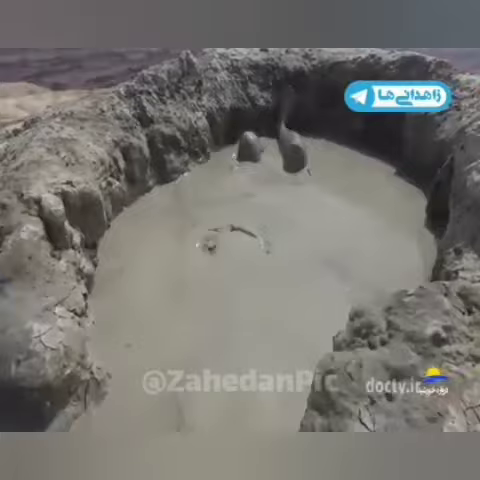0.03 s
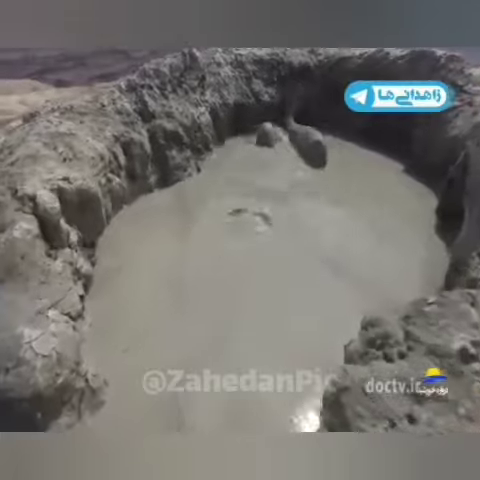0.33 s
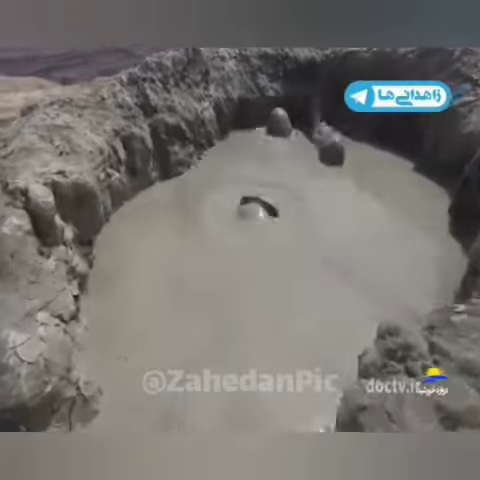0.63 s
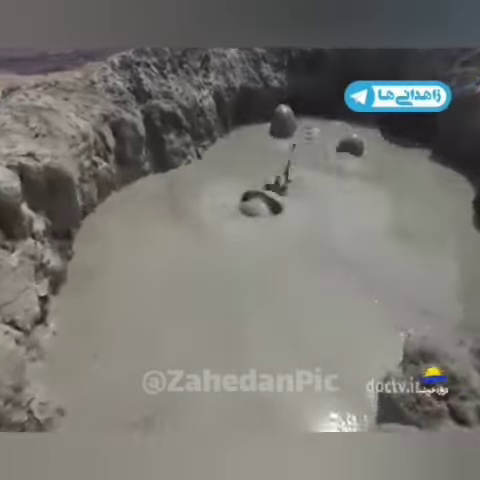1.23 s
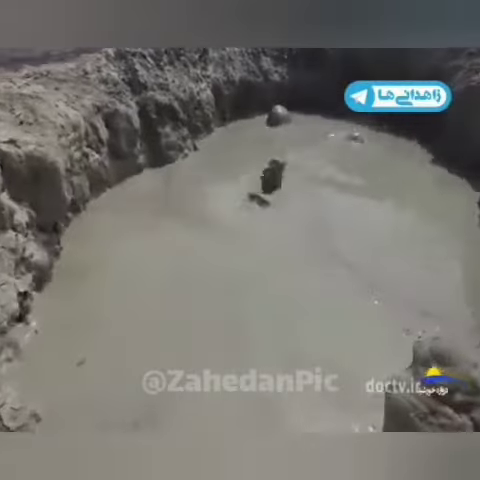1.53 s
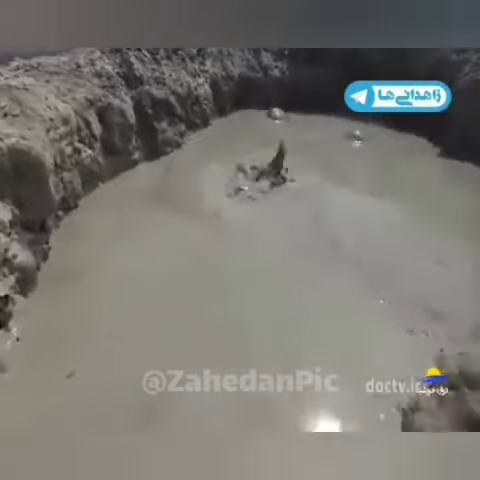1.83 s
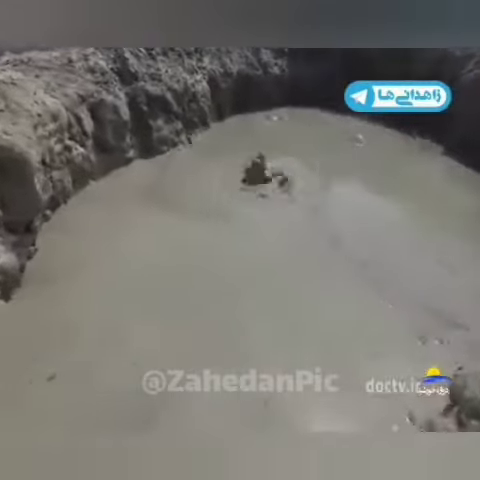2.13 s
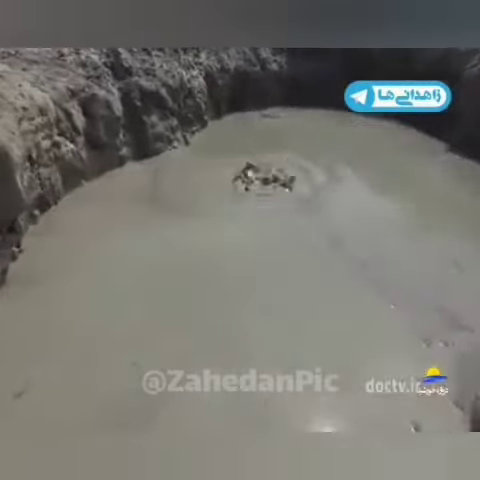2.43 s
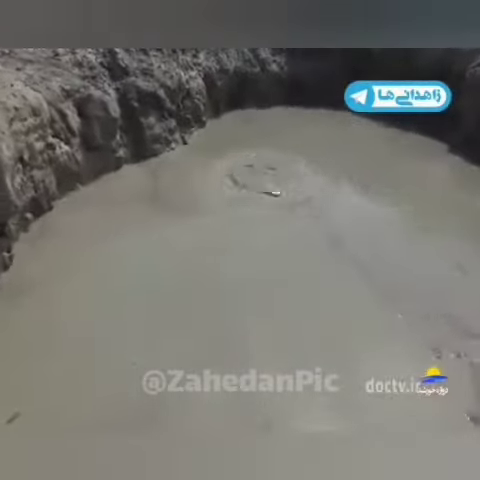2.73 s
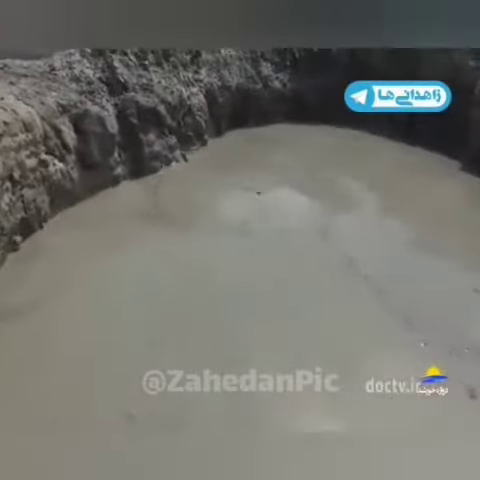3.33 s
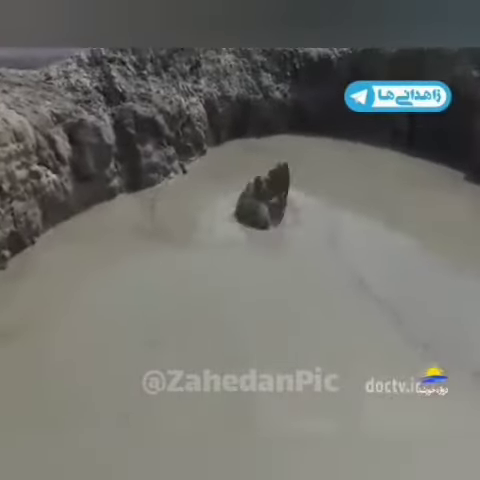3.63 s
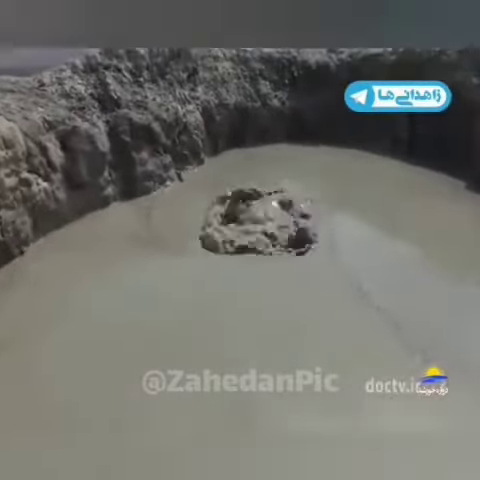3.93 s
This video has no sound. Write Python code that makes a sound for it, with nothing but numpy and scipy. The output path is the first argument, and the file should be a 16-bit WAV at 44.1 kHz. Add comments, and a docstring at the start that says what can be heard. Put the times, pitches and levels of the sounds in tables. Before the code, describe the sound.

Gas bubbles up through a nearby mud pool with rising bloops, plops and wet spits, thinning out before one louder, gushing burst at the end. Low wind rumble thumps the microphone, mostly on the right.

```python
"""A small crater with a pool of thick mud, gas bubbling up through it. Each bubble tears open and its
cavity whoops upward as the hole widens; blobs plop back, wet films spit and fine drops splatter.
A big bubble erupts at the end. Wind buffets the microphone, mostly on the right, over a faint hiss,
with a low, churning flutter on that side for the first second and a half."""
import sys
import numpy as np
from scipy import signal
from scipy.fft import rfft, irfft, next_fast_len
from scipy.io import wavfile
from scipy.ndimage import map_coordinates

SR = 44100
rng = np.random.default_rng(int(sys.argv[2]) if len(sys.argv) > 2 else 0)


def inscribe(sig):
    """Save sig as 16-bit PCM at rate SR to the path in sys.argv[1].

    A 1-D sig is mono; a 2-D sig holds one channel per row.
    Samples are clipped to [-1, 1] before scaling.
    """
    pcm = np.round(np.clip(np.atleast_2d(sig).T, -1, 1) * 32767)
    wavfile.write(sys.argv[1], SR, pcm.astype(np.int16))


N = 4 * SR
TOP_HZ = 9750
RING_RISE = 0.2  # a ring's pitch climbs by twice this fraction as it falls 60 dB


def amp(db):
    """Decibels to gain."""
    return 10 ** (np.asarray(db) / 20)


def unit(x):
    """Scale to rms 1."""
    return x / np.sqrt(np.mean(x ** 2) + 1e-20)


def along(points, hz):
    """Read (freq_hz, value) points on a log frequency axis."""
    freqs, values = np.transpose(points)
    return np.interp(np.log(hz + 1), np.log(freqs + 1), values)


def curve(rows):
    """One value per sample from (time_s, value) rows."""
    return np.interp(np.arange(N) / SR, *np.transpose(rows))


def wobble(per_s, size=N):
    """A smooth random curve with per_s knots a second."""
    return map_coordinates(rng.standard_normal(4096), [np.arange(size) * per_s / SR], mode="wrap")


def filtered(x, response):
    """Equalise x with a gain given as a function of frequency."""
    size = x.shape[-1]
    padded = next_fast_len(size + 8192)
    return irfft(rfft(x, padded) * response(np.fft.rfftfreq(padded, 1 / SR)), padded)[..., :size]


def noise(colour, size=N):
    """Noise of rms 1, coloured by (freq_hz, level_db) points."""
    return unit(filtered(rng.standard_normal(size), lambda hz: amp(along(colour, hz))))


def add(track, start_s, sound):
    """Mix a sound into the track."""
    part = track[max(0, round(start_s * SR)):][:len(sound)]
    part += sound[:len(part)]


def swarm(per_s, centre_hz, spread, cycles, size=N):
    """Many little grains of random pitch and strength, each a brief rising ring; rms 1."""
    attack_cycles = 1.15
    when, pitch, strength, phase = rng.random((int(per_s * size / SR), 4)).T
    hz = np.clip(centre_hz * (pitch / (1 - pitch)) ** (spread / 2), 120, TOP_HZ)
    lengths = (SR * cycles / hz * 2 / 3).astype(int) + 1  # each ring stops 40 dB down
    grain = np.repeat(np.arange(len(hz)), lengths)
    step = np.arange(len(grain)) - (np.cumsum(lengths) - lengths)[grain]
    age = step * (hz / SR / cycles)[grain]
    ring = np.sin(2 * np.pi * (phase[grain] + cycles * age * (1 + RING_RISE * age)))
    ring *= np.minimum(age * cycles / attack_cycles, 1) * amp(-60 * age)
    ring *= amp(-2.5 * np.log(strength + 0.0066))[grain]  # a few stand out
    return unit(np.bincount((when * size).astype(int)[grain] + step, ring, size)[:size])


def pushes(rows, cycles):
    """Brief push-and-pull swings of pressure, each about one cycle long."""
    out, t = np.zeros(N), np.arange(-SR // 20, SR // 20) / SR
    for peak_s, hz, db in rows:
        add(out, peak_s + t[0], amp(db) * np.sin(2 * np.pi * hz * t) / np.cosh(t * hz / cycles) ** 2)
    return out


def wind():
    """Wind buffets the microphone: lumpy rumble, thumping eddies and hollow knocks, mostly right."""
    # buffeting: time_s, level_db
    gusts = [(0.0, -26), (0.28, -21.5), (0.34, -28), (0.48, -20), (0.64, -33), (0.7, -19), (0.88, -34.6),
             (0.92, -20), (1.02, -26.5), (1.38, -21), (1.5, -26), (1.8, -27), (1.92, -32), (1.96, -27),
             (2.1, -34), (2.3, -24.5), (2.54, -32), (2.72, -20), (2.8, -36.5), (2.88, -21.5), (2.94, -40.5),
             (3.0, -22.5), (3.16, -44), (3.24, -27.5), (3.99, -22.5)]
    # rumble colour: freq_hz, level_db
    colour = [(15, -21), (30, -4), (55, 1.5), (125, -1.5), (190, -8), (300, -13.5), (500, -28), (900, -39),
              (2000, -46), (9000, -87)]
    # single eddies: peak_s, pitch_hz, level_db
    thumps = [(0.0778, 71.5, -15), (0.14, 62.5, -14), (0.1535, 148, -17.5), (0.1912, 107, -13.6),
              (0.2558, 111.4, -10.5), (0.3074, 88.0, -13.5), (0.4011, 78.0, -13.0), (0.4948, 190.0, -13),
              (0.5206, 66.0, -15.5), (0.6916, 87, -13), (0.7156, 105.0, -16.5), (0.7452, 97.4, -18.5),
              (0.7764, 109, -13), (0.9547, 88.0, -13), (0.9904, 93.4, -18), (1.0237, 88.0, -18),
              (1.1915, 74.0, -13), (1.2955, 73.6, -15.4), (1.3432, 79.3, -17), (1.3886, 96, -9.5),
              (1.4429, 94.0, -15.5), (1.6709, 65.5, -15.5), (1.8904, 100, -17.5), (2.2963, 56.7, -13.5),
              (2.6504, 54.8, -16.5), (2.6977, 94.6, -14.5), (2.7359, 58.2, -18.5), (2.882, 121, -17),
              (3.0, 131.5, -18), (3.0256, 75, -17.5), (3.252, 116, -17), (3.385, 134.5, -16),
              (3.508, 124.6, -16), (3.5644, 70.3, -14), (3.603, 100, -11.5), (3.6308, 55.0, -16),
              (3.6631, 65.2, -11.5), (3.7212, 61.7, -17.5), (3.8838, 69, -16.5), (3.9904, 94.0, -15.0)]
    # short hollow knocks: peak_s, pitch_hz, level_db
    knocks = [(.1433, 247, -21.5), (.1865, 362, -23.5), (.2331, 273, -17.5), (.4354, 284, -15.5),
              (.4944, 360, -11), (.7791, 238, -16.5), (.9335, 297, -18), (1.0479, 250, -17),
              (1.176, 278, -18), (1.1979, 282, -15.5), (3.3615, 213, -16)]
    # stereo lean: freq_hz, right_minus_left_db
    balance = [(30, 0), (60, 3.5), (125, 6), (300, 11), (600, -5)]
    lump_db, trim_db = 3, -0.7
    rumble = unit(noise(colour) * amp(lump_db * wobble(per_s=35))) * amp(curve(gusts) + trim_db)
    buffet = rumble + pushes(thumps, cycles=0.82) + pushes(knocks, cycles=0.93)
    left = filtered(buffet, lambda hz: 2 / (1 + amp(along(balance, hz))))
    return np.array([left, 2 * buffet - left])


def air():
    """Faint hiss that slowly swells and recedes, wider in the high treble."""
    # hiss colour: freq_hz, level_db
    colour = [(100, 9.5), (500, -0.5), (1000, -3.5), (2500, -7.5), (5500, -8), (6400, -15.5), (8000, -8.5),
              (9500, -17.5)]
    # slow swells: time_s, gain_db
    swells = [(0, 2), (.6, -0.5), (1.2, 4.5), (1.6, -1.5), (2.1, 3.5), (2.5, 3), (2.85, 0), (3.05, 1),
              (3.22, 6), (3.42, 5.5), (3.55, -3), (4, -2.5)]
    width = [(200, .2), (2000, .08), (4500, 0.1), (8000, 0.58)]  # freq_hz, side_over_mid
    bed_db = -53.5
    mid = noise(colour)
    side = filtered(noise(colour), lambda hz: along(width, hz))
    return amp(bed_db + curve(swells)) * np.array([mid + side, mid - side])


def low_flutter():
    """A low, lumpy churning flutter on the right for the first second and a half."""
    # swells of the flutter: time_s, level_db
    swells = [(0, -44.5), (.17, -29.5), (.33, -49), (.45, -27), (.62, -45.5), (.77, -33.5), (.87, -51.5),
              (.95, -28.5), (1.08, -40), (1.19, -30), (1.44, -40.5), (1.5, -54.5)]
    pan_right = amp([[-5.5], [5.5]])
    return swarm(per_s=200, centre_hz=290.5, spread=0.451, cycles=9.3) * amp(curve(swells)) * pan_right


def splatter():
    """Small drops and a finer wet fizz rise and fall together."""
    # how busy the mud is: time_s, level_db
    activity = [(0, -40.5), (.16, -42.5), (.25, -41), (.3, -57), (.39, -65.5), (.43, -38.5), (.5, -49.5),
                (.62, -48.5), (.76, -52), (.88, -46.5), (.95, -40.5), (1.22, -44), (1.44, -42), (1.5, -54),
                (1.69, -47), (1.74, -50), (1.95, -39), (2.04, -53), (2.22, -51.5), (2.37, -37),
                (2.5, -46.5), (2.57, -43), (2.7, -59), (3.6, -50.5), (3.8, -47), (4, -33.5)]
    drops = amp(-3.5) * swarm(per_s=520, centre_hz=1723, spread=0.647, cycles=43)
    fizz = amp(-10) * swarm(per_s=1100, centre_hz=4864, spread=0.464, cycles=40)
    return (drops + fizz) * amp(curve(activity))


def jitter(turns, per_cycle):
    """Random wavering of a note's level and phase, with per_cycle knots in each cycle."""
    knots = rng.standard_normal((2, 256)).T @ [1, 1j]
    return map_coordinates(knots, [turns * per_cycle], mode="wrap") / np.sqrt(2)


def bubbles():
    """The cavity's note climbs as the hole widens; rough ones flutter and rasp with escaping gas."""
    # opening bubbles: start_s, length_s, start_hz, end_hz, level_db, crest_fraction, roughness
    whoops = [ (0.026, 0.028, 865, 1110, -35, 0.31, 0.6), (0.058, 0.011, 1440, 2160, -32.5, 0.38, 0.5),
              (0.146, 0.038, 508, 531, -29, 0.54, 0.67), (0.212, 0.038, 1156, 2154, -39, 0.85, 0.55),
              (0.253, 0.012, 1390, 2630, -39, 0.2, .4), (0.407, 0.028, 704, 1644, -33, 0.95, 0.97),
              (1.058, 0.05, 1300, 1698, -38.5, 0.53, 0.8), (1.127, 0.069, 497, 1100, -31.5, 0.03, 0.97),
              (1.2, 0.11, 487, 778, -32.5, 0.33, 0.4), (1.324, 0.019, 1670, 1870, -37.5, 0.22, 0.4),
              (1.507, 0.033, 604, 1214, -35, 0, 0.3), (1.509, 0.082, 336, 926, -25.5, 0.48, 0.33),
              (1.713, 0.045, 957, 2880, -29.5, 0.07, 0.79), (1.714, .085, 322, 822, -32, 0.37, 0.43),
              (1.792, 0.04, 960, 1390, -33, 0.25, 0.66), (1.803, 0.0553, 286.5, 490, -27.5, 0.6, 0.25),
              (1.817, 0.074, 536, 1015, -35, 0.5, 0.67), (1.904, .062, 408, 1506, -25.5, 0.78, 0.27),
              (1.959, 0.024, 1484, 2900, -41, 0, .4), (1.982, 0.12, 201.4, 665, -29, 0.42, 0.16),
              (2.157, 0.11, 295, 837, -38.5, 0.47, 0.56), (2.253, 0.035, 800, 1414, -35, 0.1, 0.82),
              (2.315, 0.047, 760, 1766, -31.5, 0, 0.84), (2.304, 0.095, 309, 943, -33.5, 0.28, 0.5),
              (2.545, 0.042, 901, 2340, -32.5, 0.37, 0.86), (3.648, 0.084, 378, 695, -29.5, 0, 0.49),
              (3.837, .125, 176.4, 534, -21.5, 0.12, 0.2), (3.91, 0.053, 388.5, 516, -20.5, 0.3, 1.1),
              (3.946, 0.022, 713, 1143, -26.5, 0.5, 0.3), (3.967, 0.029, 1776, 2500, -29, .3, 0.8),
              (3.974, 0.021, 622, 924, -27, .5, 0.6)]
    overtone_ratio, overtone_db, rasp_db = 2.1, -28.5, -2
    bend_power, swell_power, fade_power = 1.08, 0.32, 0.69
    surge_db, surge_s = 2, .007  # a brief lift at the loudest point
    out = np.zeros(N)
    for start_s, length_s, start_hz, end_hz, db, crest, rough in whoops:
        progress = np.linspace(0, 1, int(length_s * SR))
        crest, rough = np.clip(crest, .03, .95), np.clip(rough, 0, 1)
        turns = np.cumsum(start_hz * (end_hz / start_hz) ** (progress ** bend_power)) / SR
        swell = (progress / crest) ** swell_power
        fade = ((1 - progress) / (1 - crest)) ** fade_power
        surge = amp(surge_db * np.exp(-((progress - crest) * length_s / surge_s) ** 2))
        flutter = jitter(turns, per_cycle=0.3074)
        rasp = amp(rasp_db) * jitter(turns, per_cycle=1.1)
        texture = np.sqrt(1 - rough ** 2) + rough * (flutter + rasp)
        tone = np.exp(2j * np.pi * turns) + amp(overtone_db) * np.exp(2j * np.pi * overtone_ratio * turns)
        add(out, start_s, amp(db + .5) * np.minimum(swell, fade) * surge * np.imag(texture * tone))
    return out


def spits():
    """A film tears: a short crackling puff swells and dies through a small resonant hole."""
    # tearing films: time_s, centre_hz, level_db, decay_s
    tears = [(0.047, 4620, -40, 0.031), (0.074, 6640, -40.5, 0.099), (0.127, 3010, -35.5, .02),
             (.128, 1500, -31, 0.021), (0.175, 3280, -36, 0.048), (0.194, 2200, -33, 0.047),
             (.202, 5440, -36.5, 0.065), (0.239, 4530, -36.5, 0.024), (.158, 1970, -33, 0.075),
             (0.426, 2750, -39, 0.026), (0.439, 4440, -42, 0.0074), (0.49, 1190, -39.5, 0.046),
             (0.668, 2330, -40.5, 0.0068), (0.759, 2790, -42, 0.055), (0.834, 5100, -35.5, 0.046),
             (0.923, 6500, -39, 0.047), (.93, 1940, -33, .04), (0.95, 2120, -32, 0.014),
             (0.987, 4500, -38, 0.11), (1.008, 6700, -38, 0.016), (1.091, 3300, -36.5, 0.053),
             (1.162, 5980, -42.5, 0.036), (1.339, 6100, -39.5, 0.017), (1.411, 3500, -43.5, 0.061),
             (1.034, 2690, -37.5, 0.04), (2.208, 2810, -41, 0.049), (2.375, 3750, -43, 0.098),
             (2.398, 2460, -34, 0.01), (2.436, 3100, -36, 0.023), (2.441, 4500, -33, 0.02),
             (2.46, 4220, -34.5, 0.068), (2.471, 2680, -39, 0.049), (3.251, 4100, -42, 0.045),
             (3.288, 3940, -41, 0.015), (3.354, 3780, -33, 0.012), (3.831, 5300, -29.5, 0.017),
             (3.853, 5840, -35, 0.012), (3.888, 2590, -28.5, 0.015), (3.946, 2020, -21.5, 0.071)]
    hole_q, swell_s, delay_s, grain_db = 1.38, .009, .001, 3
    out, t = np.zeros(N), np.arange(SR // 12) / SR
    for time_s, centre_hz, db, decay_s in tears:
        crackle = rng.standard_normal(len(t)) * amp(grain_db * wobble(per_s=1200, size=len(t)))
        hole = lambda hz: 1 / (1 + (hole_q * (hz / centre_hz - centre_hz / (hz + 1))) ** 2)
        past_peak_s = t - swell_s
        envelope = amp(db - 60 * np.maximum(past_peak_s / decay_s, -past_peak_s / swell_s))
        add(out, time_s + delay_s - swell_s, envelope * unit(filtered(crackle, hole)))
    return out


def plops():
    """The skin snaps, then a few damped cycles ring and rise a little in pitch."""
    # falling blobs and small bubbles: start_s, pitch_hz, level_db
    blobs = [(.071, 480, -14), (.092, 1670, -22.5), (0.156, 1200, -17), (.2, 850, -23), (.237, 904, -30),
             (0.567, 527, -26), (0.946, 2705, -17), (0.988, 800, -19.5), (1.011, 1100, -25.5),
             (1.07, 1417, -24), (1.098, 1470, -26), (1.222, 1150, -16.5), (1.222, 365, -16),
             (2.398, 834, -14.5), (2.458, 925, -26.5), (2.46, 3800, -18.5), (2.475, 1680, -25.5),
             (2.533, 2110, -27.5), (3.209, 3480, -24.5), (3.264, 3640, -22), (3.354, 3380, -21.5),
             (2.628, 1350, -29.5), (3.634, 1930, -26), (3.759, 1670, -23.5), (3.834, 930, -20.5),
             (3.868, 785, -22), (3.902, 915, -15), (3.914, 1203, -17.5), (3.913, 400, -16.5),
             (3.925, 407, -18), (3.939, 477, -16), (3.946, 2076, -17.5)]
    attack_s, snap_db, snap_decay_s = 0.00087, -12, 0.012
    out, t = np.zeros(N), np.arange(SR // 10) / SR
    for start_s, pitch_hz, db in blobs:
        decay_s = 0.033 * (500 / pitch_hz) ** .7  # low plops ring longer
        phase = 2 * np.pi * pitch_hz * (t + RING_RISE * t * t / decay_s)
        ring = amp(-60 * t / decay_s) * (1 - np.exp(-t / attack_s)) * np.sin(phase)
        cutoff_hz = 1.26 * pitch_hz
        snap = unit(filtered(rng.standard_normal(len(t)), lambda hz: 1 / (1 + (hz / cutoff_hz) ** 2)))
        add(out, start_s, amp(db) * (ring + amp(snap_db - 60 * t / snap_decay_s) * snap))
    return out


def eruption():
    """A big bubble blows out: a ragged rush of gas and a shower of ringing blobs."""
    # swell of the blowout: time_s, level_db
    blowout = [(3.816, -51.5), (3.832, -30.5), (3.884, -36), (3.906, -27), (3.94, -24.5), (3.95, -22),
               (3.965, -20.5), (3.971, -27), (4.0, -26)]
    # colour of the gas rush: freq_hz, level_db
    colour = [(120, -63), (200, -26.5), (384, -4), (669, -10.5), (883, -3.5), (1290, -13.5), (2100, -11.5),
              (3650, -24), (7870, -27.5), (9890, -48), (12900, -77), (21800, -120)]
    start_s, ragged_db = blowout[0][0], 0.5
    out, size = np.zeros(N), SR // 4
    rush = unit(noise(colour, size) * amp(ragged_db * wobble(per_s=250, size=size)))
    blobs = swarm(per_s=520, centre_hz=800, spread=.75, cycles=20, size=size)
    add(out, start_s, amp(-4.5) * rush + amp(-6) * blobs)
    return out * amp(curve(blowout))


def crater(dry):
    """The close earth walls give a short answer, different on each side."""
    wet_db, decay_s, predelay_s = -31.5, 0.09, .004
    t = np.arange(SR // 4) / SR
    tail = rng.standard_normal((2, len(t))) * amp(-60 * t / decay_s) * (t > predelay_s)
    tail /= np.linalg.norm(tail[0])
    return dry + amp(wet_db) * signal.fftconvolve(dry[None], tail, axes=1)[:, :N]


def scene():
    """The mud straight ahead, low flutter and wind to the right, hiss around them."""
    ahead = crater(bubbles() + plops() + spits() + splatter() + eruption())
    return ahead + low_flutter() + wind() + air()


def record(dry):
    """A soft limiter rounds off the highest peaks; everything above TOP_HZ is cut."""
    ceiling_db = -6.2
    rounded = dry / (1 + (dry / amp(ceiling_db)) ** 8) ** (1 / 8)
    return filtered(rounded, lambda hz: hz < TOP_HZ)


dry = scene()
out = record(dry)
inscribe(out)
```